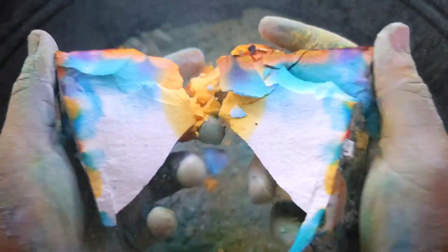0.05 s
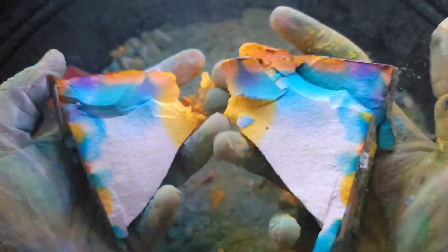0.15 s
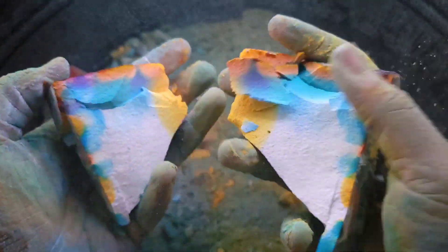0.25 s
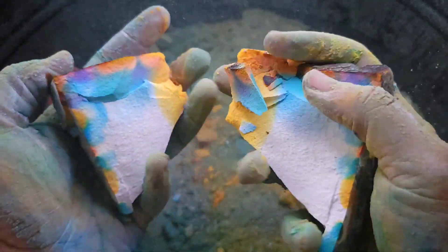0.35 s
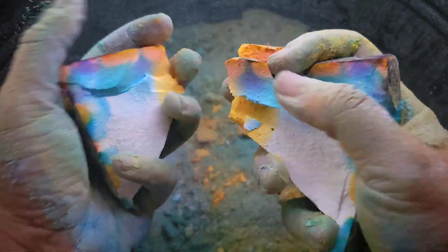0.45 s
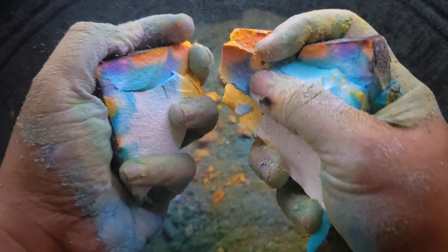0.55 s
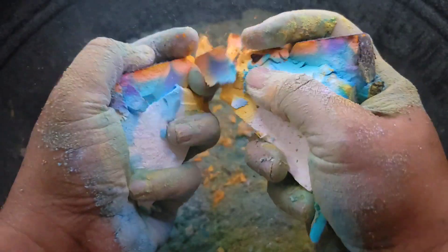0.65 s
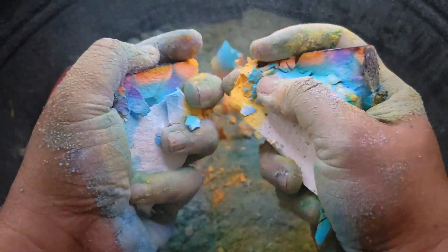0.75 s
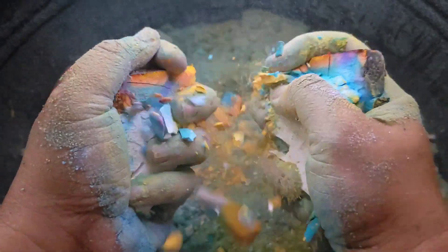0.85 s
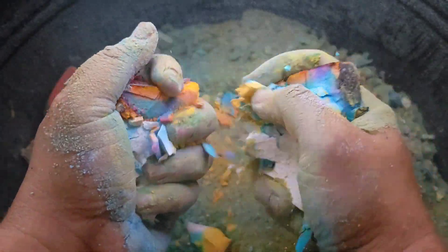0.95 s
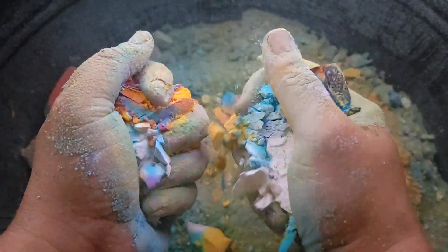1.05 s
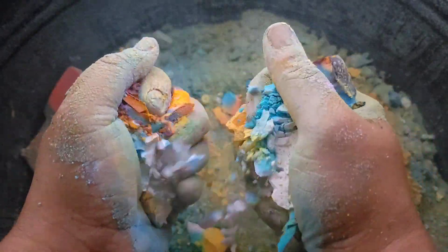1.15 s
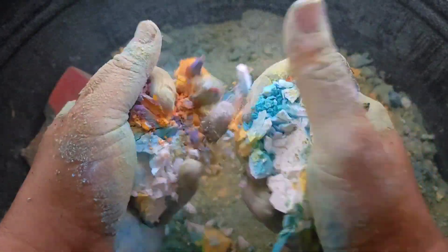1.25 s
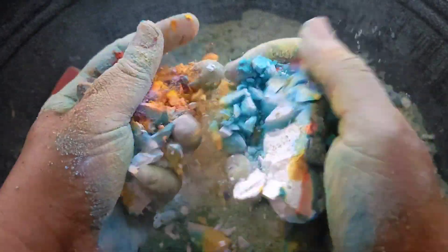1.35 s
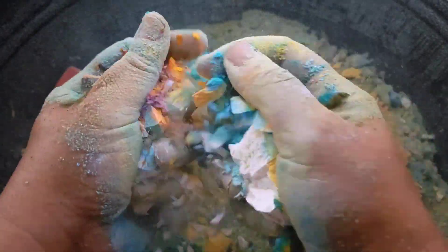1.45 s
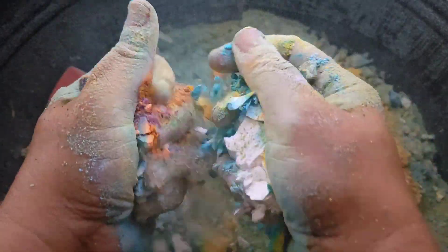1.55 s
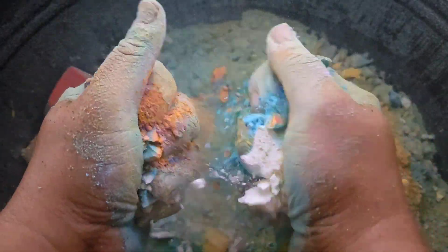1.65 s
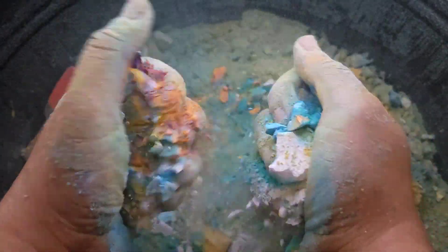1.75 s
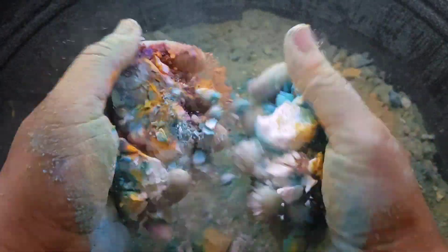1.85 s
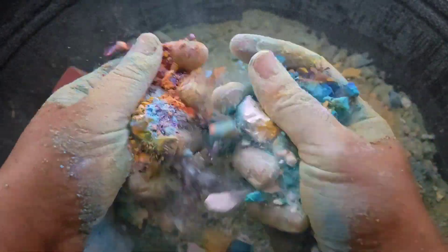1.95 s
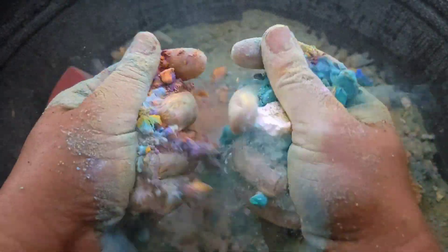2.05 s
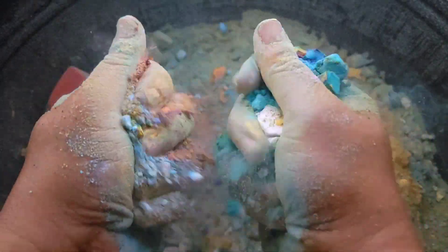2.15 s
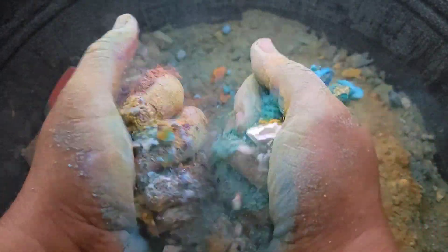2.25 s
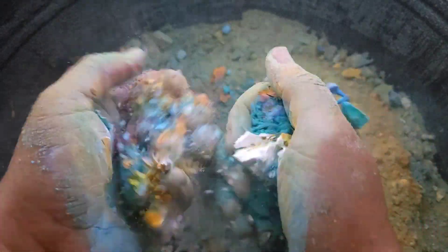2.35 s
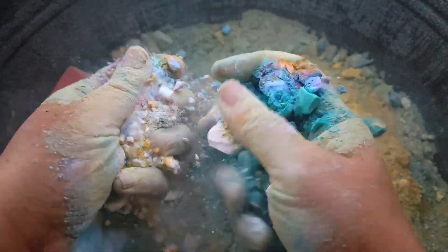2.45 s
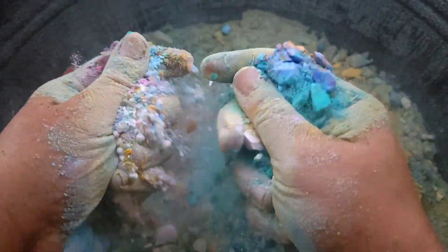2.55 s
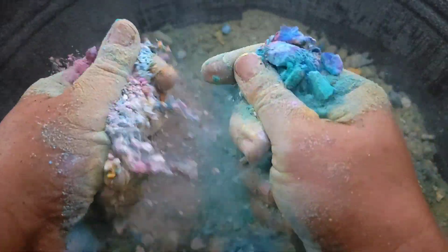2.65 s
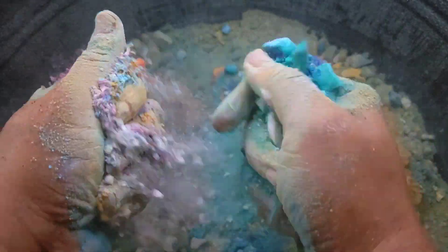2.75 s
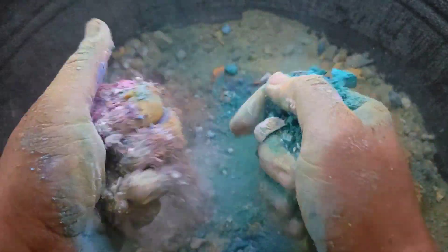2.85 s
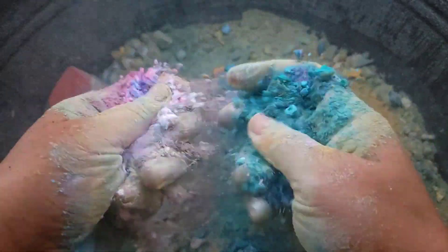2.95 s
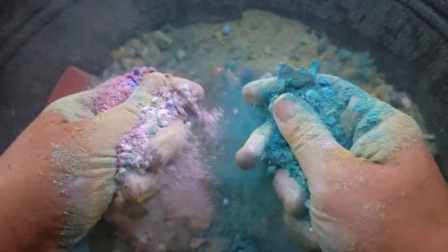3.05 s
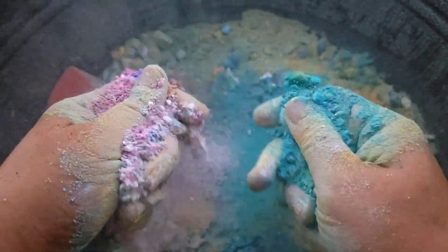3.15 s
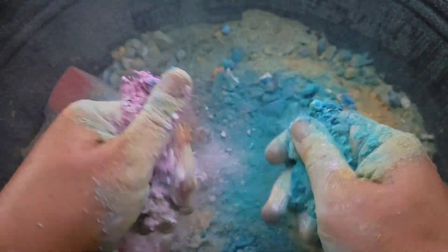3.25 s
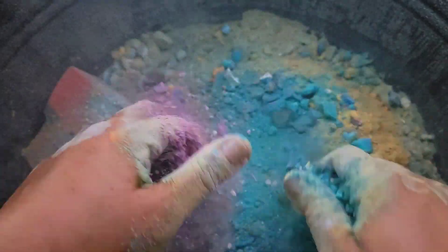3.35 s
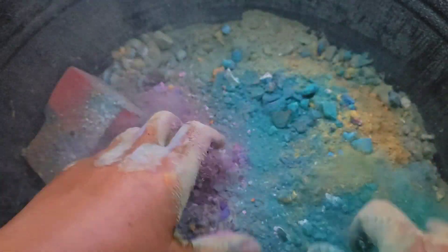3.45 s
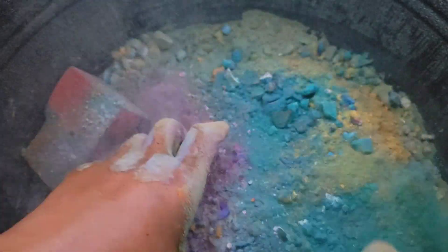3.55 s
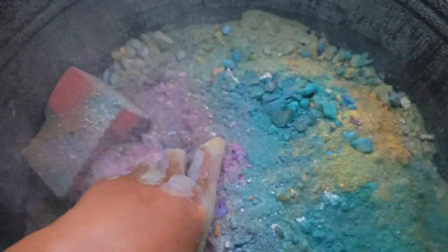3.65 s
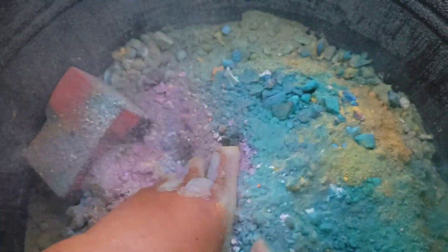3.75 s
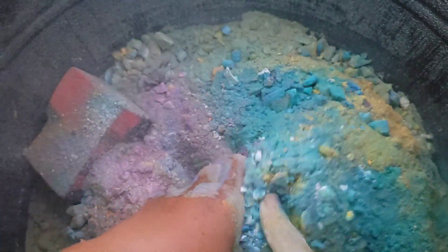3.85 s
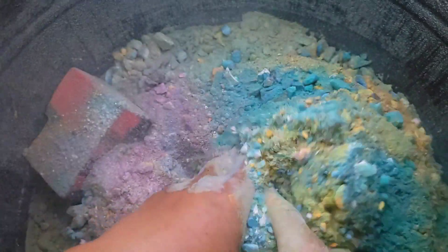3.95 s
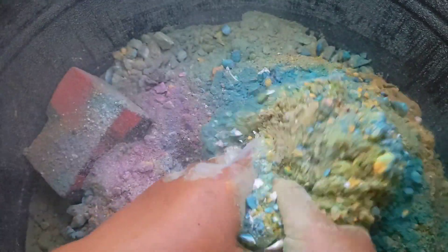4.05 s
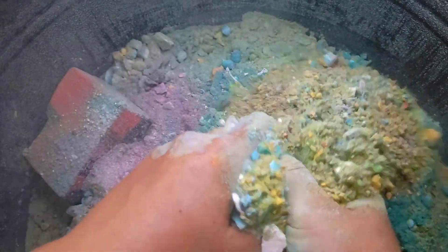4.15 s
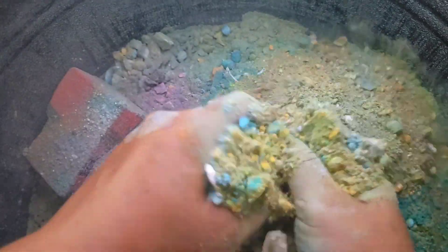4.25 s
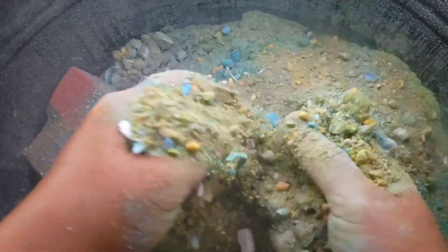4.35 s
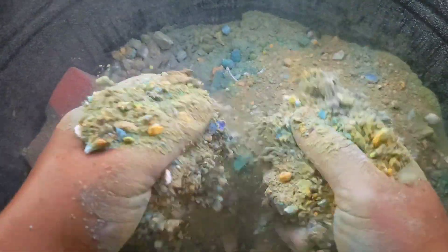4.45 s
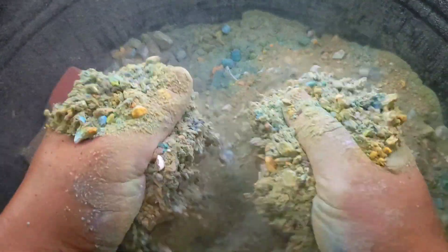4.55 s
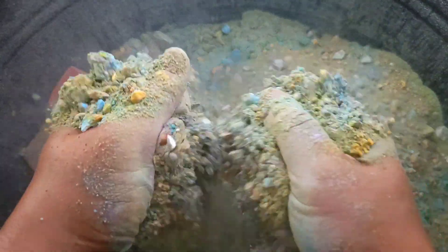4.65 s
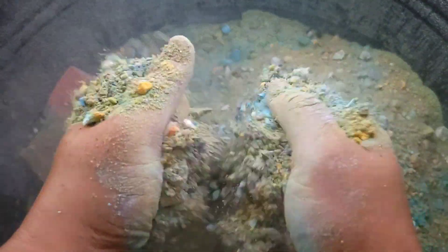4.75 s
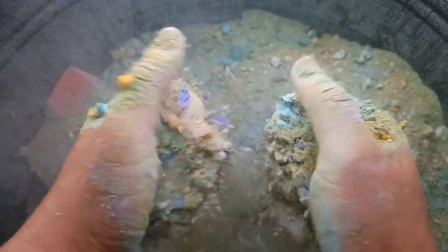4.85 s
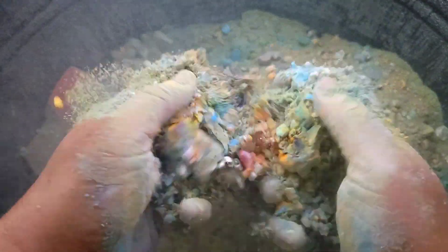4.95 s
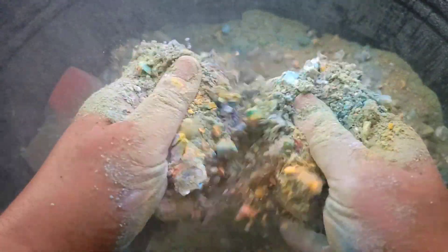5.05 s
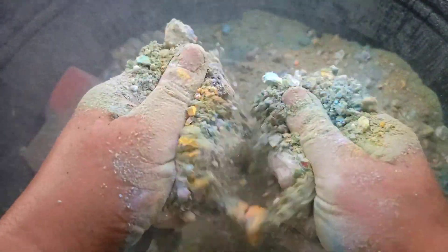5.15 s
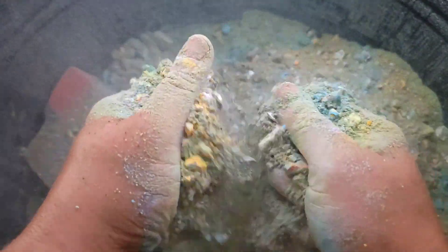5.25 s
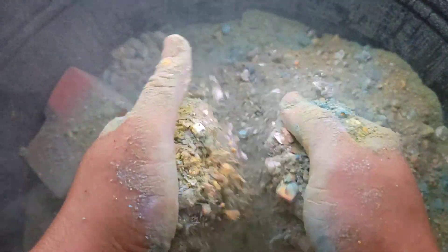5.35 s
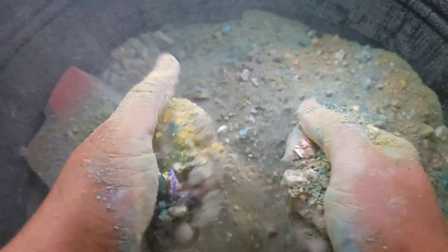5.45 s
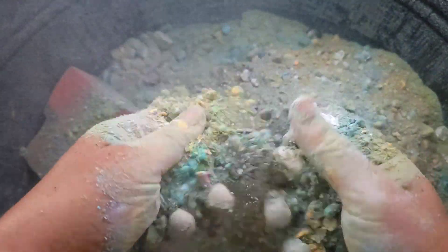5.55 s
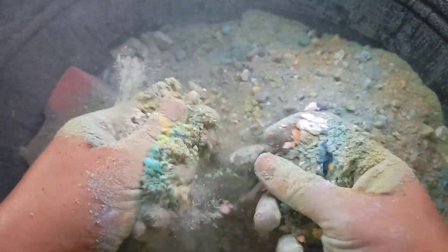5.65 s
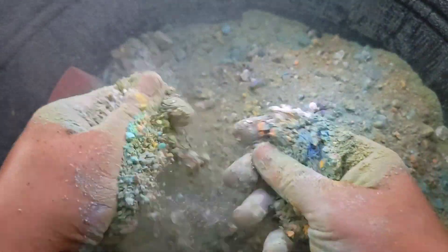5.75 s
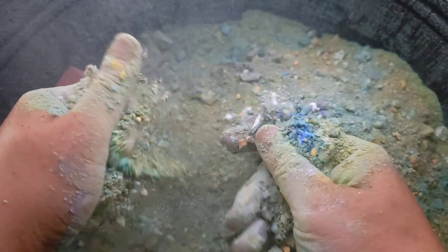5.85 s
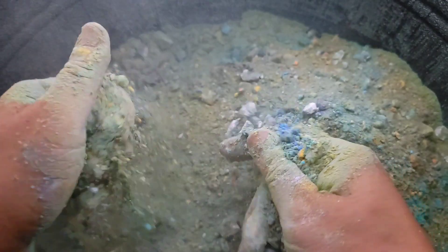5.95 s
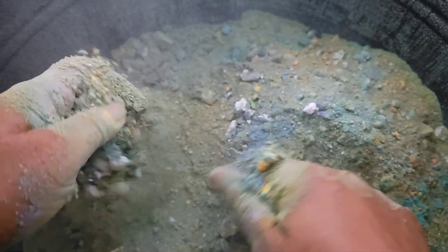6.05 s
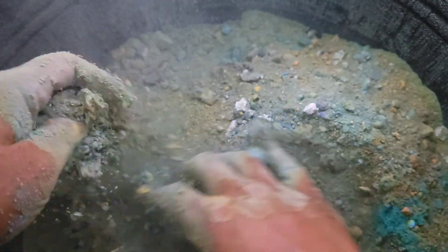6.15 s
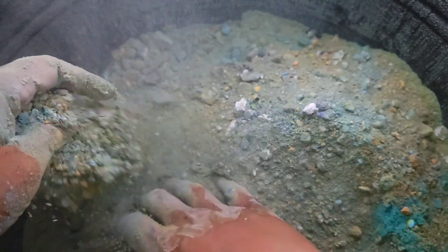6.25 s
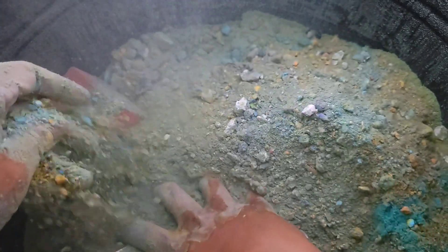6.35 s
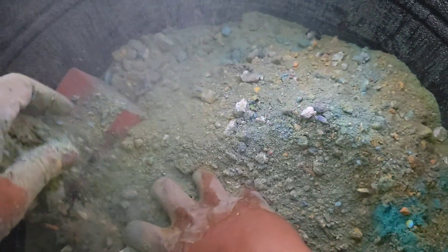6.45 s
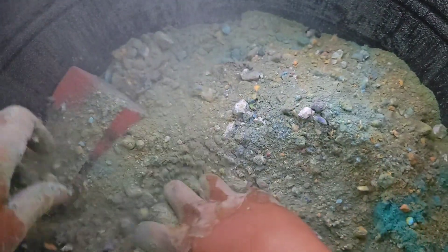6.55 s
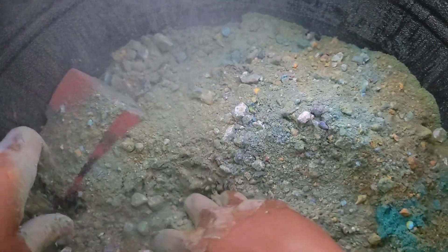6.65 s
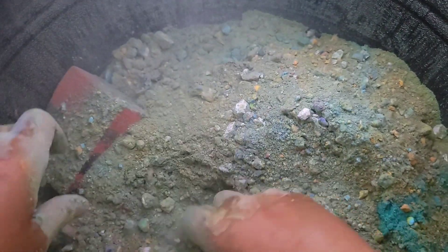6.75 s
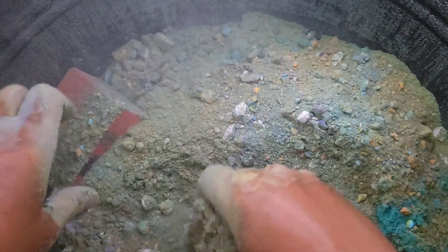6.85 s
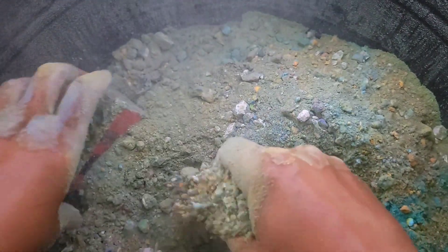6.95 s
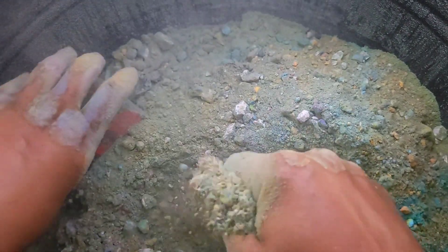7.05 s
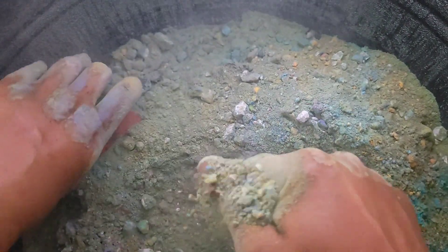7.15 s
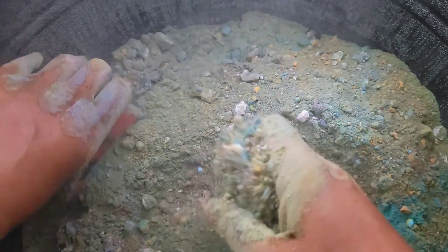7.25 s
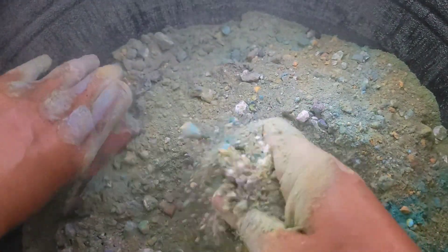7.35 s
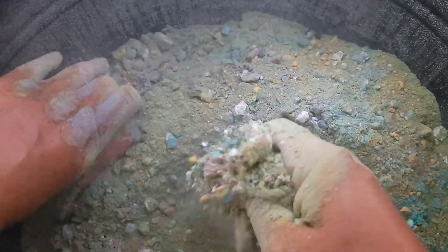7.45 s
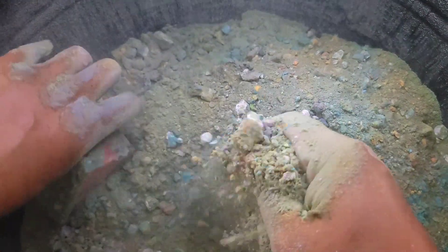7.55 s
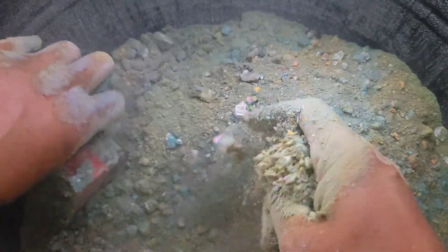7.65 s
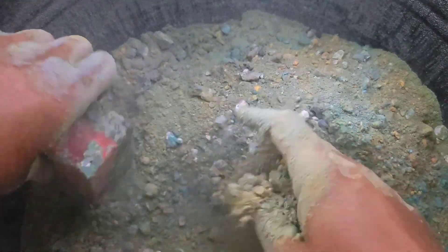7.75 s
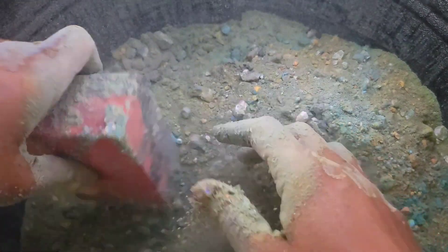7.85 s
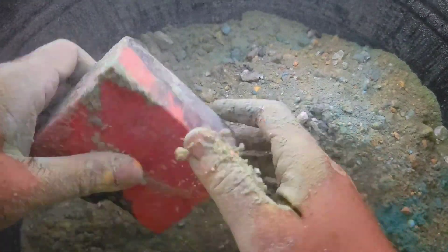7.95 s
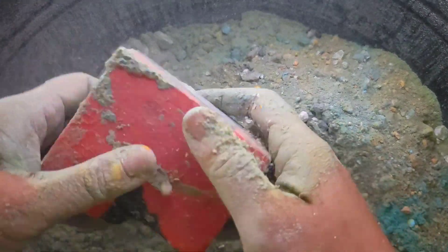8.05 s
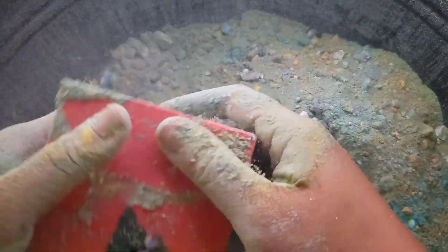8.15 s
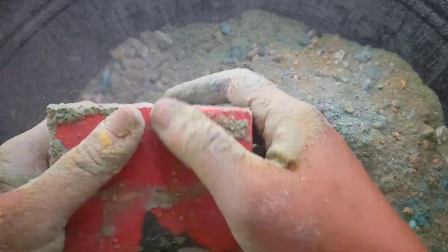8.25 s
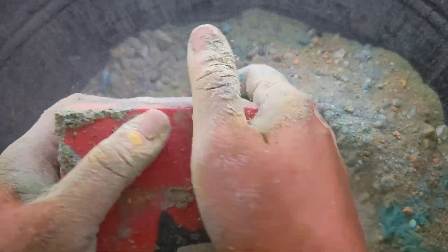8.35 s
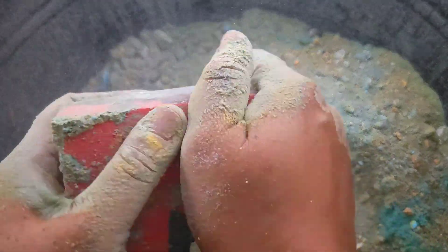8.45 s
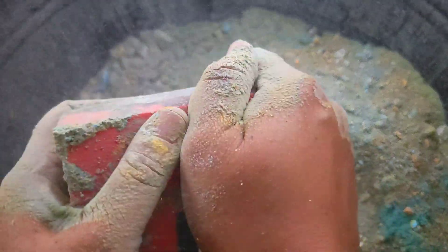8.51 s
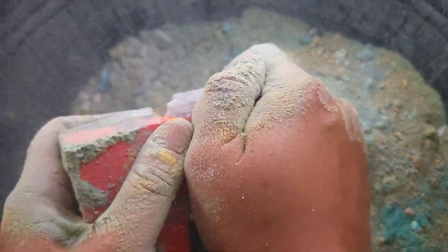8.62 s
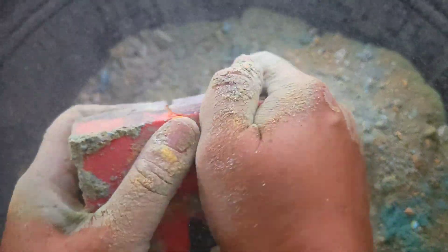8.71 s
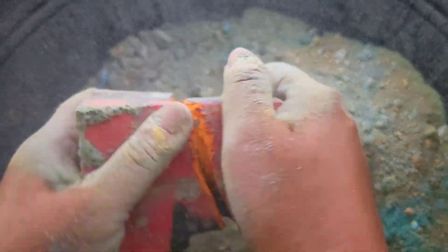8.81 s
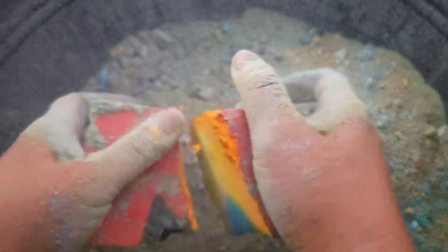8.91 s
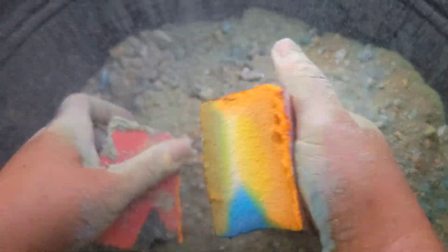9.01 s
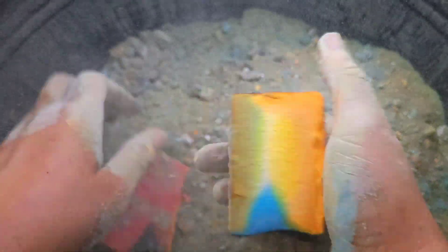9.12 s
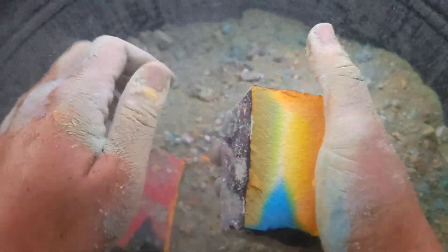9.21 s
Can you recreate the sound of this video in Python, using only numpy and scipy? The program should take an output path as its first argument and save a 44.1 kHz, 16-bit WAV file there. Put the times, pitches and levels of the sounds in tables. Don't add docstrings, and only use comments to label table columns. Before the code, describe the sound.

Hands snap and crush dry chalk blocks close up, crumbling them into gritty powder, then scoop, rumble and squeak over a faint hum.

```python
import sys
import numpy as np
from scipy import signal
from scipy.fft import rfft, irfft, next_fast_len
from scipy.io import wavfile
from scipy.ndimage import uniform_filter1d, map_coordinates

SR = 44100
rng = np.random.default_rng(int(sys.argv[2]) if len(sys.argv) > 2 else 0)


def wav_out(sig):
    wavfile.write(sys.argv[1], SR, np.round(np.clip(np.atleast_2d(sig).T, -1, 1) * 32767).astype(np.int16))


def volts(x):
    e = np.asarray(x, float) / 20
    return 10 ** e


N = 409248

# (frequency [Hz], level [dB])
AIR_SPECTRUM = [(15, -43), (25, -18), (70, -1.5), (149, -7), (236, -1.5), (659, -22.5), (988, -23),
                (1890, -44), (2480, -28), (3340, -53), (6920, -33), (16000, -46)]
# (frequency [Hz], level [dB])
HEAP_SPECTRUM = [(88, -10), (150, -8.5), (463, -3), (775, -15.5), (1350, -15.5), (3000, -35), (3900, -62),
                 (6600, -120)]
# (frequency [Hz], level [dB])
GRIT_SPECTRUM = [(530, -6.5), (900, 1), (1820, -3), (2010, -1), (3890, 0), (8000, -8.5), (10400, -16),
                 (17600, -120)]
# (frequency [Hz], level [dB])
DUST_SPECTRUM = [(3530, -12), (6000, -5.5), (12000, -18), (15100, -23), (16000, -25)]
# (time [s], pressure [dB], dustiness [dB])
SQUEEZE = [(0.0, -52, 23.5), (0.95, -43.5, 14), (1.32, -35.5, 11.5), (1.57, -31.5, 13.5), (1.72, -42.5, 1),
           (2.12, -46.5, 28.5), (2.4, -38.5, 4), (3.44, -41.5, 10), (3.56, -46, -20), (4.3, -40.5, -18),
           (4.73, -35.5, 13), (5.22, -35.5, 3), (5.45, -42, 1), (6.35, -40.5, 12.5), (7.15, -43, -8),
           (7.6, -39.5, 15), (8.6, -50, 1), (9.28, -58, 16)]
# (peak time [s], rise [s], fall [s], tub level [dB], heap level [dB])
SCOOPS = [(0.82, 0.12, 0.038, -33, -25), (0.998, 0.12, 0.11, -31, -49), (2.09, 0.3, 0.35, -64, -33.5),
          (3.67, 0.1, 0.28, -31.5, -31), (3.77, 0.42, 0.38, -24.5, -23.5), (4.05, 1, 0.58, -49, -35),
          (4.832, 0.039, 0.22, -30.5, -37), (5.2, 0.13, 0.62, -43, -40), (6.294, 0.1, 0.97, -31, -32),
          (6.48, 0.97, 0.53, -29, -34), (6.7, 0.78, 0.68, -54, -35), (7.44, 1, 0.94, -47, -38.5),
          (9.13, 0.076, 0.17, -35, -36)]
# (time [s], peak [dB], ring [Hz])
BREAKING_TICKS = [(0.0075, -27, 4640), (0.209, -25, 1720), (0.317, -24.5, 3350), (0.178, -22, 5890),
                  (0.4794, -24, 6760), (0.5126, -20, 5340), (0.5247, -4.5, 6150), (0.5862, -13.5, 2550),
                  (0.67, -21, 2450), (0.6908, -20, 8200), (0.763, -23, 4640), (0.8892, -5, 6500),
                  (0.914, -10, 3720), (0.872, -19, 9000), (1.0282, -8, 3570), (1.0731, -17, 5070),
                  (1.2273, -23.5, 6290), (1.3425, -23, 3620), (1.365, -18, 730), (1.3895, -16, 2970),
                  (1.44, -14.5, 2760), (1.4525, -18, 1680), (1.4586, -23, 1720), (1.505, -24, 1590),
                  (1.5632, -15.5, 1940), (1.5829, -13.5, 3400), (1.57, -15, 1800), (1.485, -23, 5800),
                  (1.7149, -20, 2670), (1.96, -17.5, 2070), (1.999, -18.5, 3320), (2.0579, -21, 5080),
                  (2.1115, -20, 2070), (1.9241, -28, 3480), (2.0798, -19, 3570), (2.3373, -24.5, 2000),
                  (2.5392, -25, 2400), (2.6678, -25, 8310), (0.9094, -16, 4260), (2.7713, -18.5, 724),
                  (2.968, -26, 1380), (2.8716, -26, 1550), (2.8914, -19.5, 730), (2.9126, -23, 720),
                  (3.0636, -26, 3270), (3.0526, -26, 2320), (3.202, -30, 3660), (3.8426, -27, 1120),
                  (3.9, -30, 7960), (3.5599, -27, 1380), (4.1626, -25.5, 990), (3.9739, -30, 1380),
                  (4.186, -24, 780), (4.235, -30, 1360), (4.2519, -26, 4310), (4.399, -23.5, 4690),
                  (4.4456, -21, 1720), (4.4743, -26, 3450), (4.5532, -20, 4350), (4.5821, -26, 4610)]
# (time [s], peak [dB], ring [Hz])
POWDER_TICKS = [(6.6117, -18, 1590), (4.68, -17, 5400), (4.7586, -15, 3680), (4.7965, -19, 1680),
                (4.872, -18, 1980), (4.8821, -17.5, 706), (4.9292, -17, 6890), (4.9827, -30, 2880),
                (5.0154, -23, 5000), (5.0327, -21, 2670), (5.0717, -17, 4780), (5.1171, -22, 2450),
                (5.1836, -21, 2540), (5.2322, -33, 2660), (5.316, -23, 720), (5.372, -29, 2410),
                (5.4418, -24, 2150), (5.5626, -24, 2710), (5.6336, -30, 2970), (5.64, -24.5, 1390),
                (5.77, -29, 2410), (5.8, -19, 2410), (5.749, -29, 1850), (5.8128, -16, 1480),
                (5.9096, -25.5, 2700), (5.889, -27, 7100), (6.0978, -27, 2240), (6.137, -21, 2540),
                (6.1588, -22, 2000), (6.185, -20, 7410), (6.2049, -25, 4650), (6.2497, -24, 3190),
                (6.2758, -21, 6200), (6.3464, -22, 1420), (6.3558, -23, 5080), (6.4185, -26, 3660),
                (6.4256, -29, 3190), (6.4426, -21, 3010), (6.503, -25, 5380), (6.5918, -19, 4650),
                (6.6203, -19, 3700), (6.65, -26, 2410), (6.738, -27, 730), (6.7604, -22, 730),
                (6.7757, -22, 960), (6.885, -26, 1680), (6.894, -23.5, 2410), (6.9032, -22, 4010),
                (6.9129, -27, 3920), (7.005, -18.5, 2410), (7.067, -19.5, 4280), (7.125, -27.5, 4780),
                (7.318, -19, 900), (7.4062, -24, 3700), (7.641, -28, 1380), (7.8682, -28, 3490),
                (7.0299, -23, 3740), (7.0538, -23, 2320), (8.4812, -32, 5850), (8.5165, -36, 2670)]
# (time [s], peak [dB], ring [Hz])
SPLINTERS = [(8.0912, -20.5, 3600), (1.1955, -18, 2060), (0.8374, 0, 3600), (8.5584, -8, 1540),
             (8.5584, 1, 4250), (3.1805, -15, 8000), (0.968, 0, 1000), (4.5205, -7.5, 1290),
             (4.632, -15.5, 1400), (9.1165, -16, 3100), (0.8871, -16, 7000), (8.559, -2, 5000)]
# (time [s], peak [dB], ring [Hz], knock [dB], edge [dB])
SNAPS = [(0.1317, -3, 1500, -13, -5.5), (0.5223, -11.5, 6300, -16, 3.5), (0.627, 1, 3830, -19.5, -6.5),
         (0.8032, 2.5, 3340, -30, -18), (0.9665, 8, 1480, -16, -17), (0.9847, -1, 4660, -13.5, -3),
         (1.0238, -2, 1860, -12.5, -11), (1.0419, -3.5, 1890, -23, -2), (1.639, -7, 1990, -12, 0),
         (2.0473, -11.5, 2060, -19, 1.5), (2.2846, -5.5, 2380, -26, -20), (3.5325, -18, 1164, -10, -47),
         (3.5409, -10.5, 1155, -15, -43), (4.5198, -2.5, 2600, -27, -33), (4.631, -4, 1940, -26, -31),
         (4.7046, -3.5, 4660, -27, -1), (4.834, -3.5, 4060, -33, -11), (5.2082, -5.5, 2540, -17, 0),
         (6.5965, -6, 1130, -19, -2.5), (6.722, -8.5, 1620, -15.5, -32.5), (6.7749, -9, 1160, -20, -31.5),
         (7.6036, -18.5, 900, 0, 4), (8.558, 1.5, 2230, -10, 2.5), (9.1161, -13, 2850, -17, -11.5)]
# (time [s], peak [dB], ring [Hz])
SHARDS = [(0.2223, -17.5, 1600), (0.2571, -12, 1780), (0.4196, -16.5, 3400), (0.504, -18, 5000),
          (0.588, -31, 2800), (0.6146, -14.5, 7600), (0.623, -11, 3920), (0.755, -16, 3660),
          (0.771, -12, 6520), (0.7965, -7, 2800), (0.8224, -1, 5250), (0.7478, -15, 4720),
          (0.8366, -2, 3580), (0.886, -17, 6300), (0.9134, -15.5, 1950), (0.9408, -15, 5300),
          (1.0622, -6.5, 3450), (1.0897, -6, 3680), (1.131, -16, 7970), (1.1935, -18.5, 4820),
          (1.3338, -16.5, 8550), (1.352, -9, 2560), (1.3597, -10, 3340), (1.4284, -13, 1310),
          (1.443, -15, 1560), (1.5946, -14, 3010), (1.6292, -11, 5880), (1.6533, -8, 3870),
          (1.6682, -5, 6360), (1.701, -14.5, 4100)]
# (time [s], peak [dB], ring [Hz])
PIECES = [(1.798, -14.5, 1940), (1.9299, -15.5, 2650), (1.962, -17, 6200), (1.9704, -8.5, 2110),
          (2.0103, -13, 1770), (2.0357, -9, 1920), (2.0671, -8, 2050), (2.086, -16, 3570),
          (2.095, -6.5, 6300), (2.1057, -12, 2000), (2.2187, -16, 3730), (2.6553, -13.5, 5000),
          (2.7072, -16, 3480), (2.739, -16, 2630), (2.7713, -11, 4060), (2.847, -16.5, 2580),
          (2.861, -16, 2500), (2.9163, -20, 5630), (2.948, -16.5, 1010), (3.0628, -21.5, 840),
          (3.093, -17.5, 3760), (3.271, -16.5, 2430), (3.282, -18.5, 760), (3.393, -13.5, 2440),
          (3.4393, -15, 5570), (3.451, -10, 2930), (3.18, -11.5, 3700), (4.237, -14, 1240),
          (4.277, -17.5, 1070)]
# (time [s], peak [dB], ring [Hz])
LUMPS = [(4.431, -19.5, 4470), (4.561, -9.5, 4540), (4.6003, -17, 1810), (4.6502, -13.5, 4430),
         (4.675, -14, 4200), (4.71, -14, 3810), (4.7334, -10, 1900), (4.7469, -9.5, 2840),
         (4.768, -16, 2780), (4.847, -13, 1830), (4.886, -9.5, 4600), (5.009, -11.5, 4030),
         (5.077, -19, 2640), (5.104, -11.5, 5130), (5.135, -15.5, 1750), (5.143, -8.5, 3900),
         (5.1718, -14.5, 3700), (5.259, -12, 3340), (5.301, -14, 6760), (5.8068, -14, 2340),
         (6.121, -12.5, 2300), (6.259, -20, 3020), (6.5288, -14, 5870), (6.63, -11.5, 1600),
         (6.849, -13, 2000), (6.994, -13, 3920), (7.0702, -19, 1770), (7.416, -11.5, 3500),
         (7.472, -10, 2860), (7.753, -17, 3170)]
# (time [s], peak [dB], ring [Hz])
STRAYS = [(0.0783, -27, 2000), (1.0274, -10, 2040), (1.247, -18, 1960), (1.4198, -15.5, 5000),
          (5.743, -18.5, 2650), (5.9885, -19, 3850), (6.099, -28, 2350), (6.4855, -15, 330),
          (7.447, -19.5, 935), (8.502, -24.5, 4550), (8.534, -30, 5500), (9.1165, -18, 850)]
# (frequency [Hz], t60 [s])
WALL_T60 = [(200, 0.41), (1000, 0.1), (5000, 0.18), (12000, 0.26)]
# (start [s], end [s], level [dB], crumb pitch [Hz])
CRUNCHES = [(0.155, 0.221, -42, 5500), (0.784, 0.851, -25, 3700), (0.847, 0.933, -33.5, 5370),
            (0.98, 0.995, -30, 4600), (1.053, 1.107, -33, 4160), (2.145, 2.222, -35, 3670),
            (2.484, 2.626, -39.5, 2900), (6.326, 6.374, -42, 3500), (6.974, 7.083, -43.5, 3970),
            (3.632, 3.901, -41.5, 1430), (4.194, 4.292, -33.5, 1150), (6.249, 6.297, -35.5, 1200),
            (6.425, 6.455, -32.5, 1540), (6.588, 6.68, -33, 1220), (7.725, 7.766, -38.5, 3580),
            (8.563, 8.653, -43.5, 4530)]
# (start [s], end [s], first level [dB], last level [dB], squeak [Hz], second squeak [Hz])
RUBS = [(0.284, 0.337, -55, -45, 5500, 3450), (0.395, 0.428, -48, -29, 4660, 6550),
        (0.442, 0.484, -50, -39, 4800, 6500), (7.987, 8.069, -40.5, -46.5, 3850, 2850),
        (8.076, 8.216, -43, -41, 3510, 2240), (8.231, 8.338, -37.5, -47, 3420, 5200),
        (8.314, 8.377, -40.5, -36, 3340, 2240), (8.361, 8.459, -37, -51, 4470, 3300),
        (8.695, 8.74, -50, -51, 2670, 6900), (8.805, 8.909, -38, -29, 6940, 3400),
        (8.932, 8.936, -37, -38, 4800, 8150), (9.241, 9.29, -54, -53, 4600, 6700),
        (9.146, 9.225, -36.5, -48, 4800, 7150), (8.754, 8.805, -57, -43, 4340, 5500),
        (9.062, 9.104, -53, -60, 5500, 7000)]
# (start [s], end [s], first level [dB], last level [dB], squeak [Hz], second squeak [Hz])
WIPES = [(7.243, 7.323, -36, -35.5, 3770, 2240), (7.49, 7.58, -42, -54.5, 6300, 3870),
         (7.593, 7.625, -40, -57, 6160, 4000), (9.097, 9.132, -44, -33, 5300, 8400),
         (9.161, 9.183, -48, -40, 7150, 4830), (7.18, 7.236, -52.5, -68, 9000, 5000),
         (7.326, 7.482, -60.5, -54.5, 6000, 4000), (7.628, 7.768, -68, -52, 6070, 4000)]
# (time [s], lift [dB])
CATCHES = [(8.022, 7), (8.089, 4.5), (8.103, 5.5), (8.135, 3), (8.171, 7.5), (8.201, 8), (8.33, 6),
           (8.365, 1), (8.804, 9), (9.119, 4), (9.176, 4.5)]
# (frequency [Hz], width [Hz], level [dB])
BLOCK_MODES = [(2290, 190, -7), (2850, 250, -7), (4800, 1200, -1), (6310, 1020, -4.5), (8400, 980, -7)]
# (time [s], peak [dB], ring [Hz])
BUMPS = [(6.285, -23, 76), (6.481, -22, 134), (7.186, -22.5, 72), (7.235, -20.5, 90), (7.317, -21.5, 80),
         (7.434, -28.5, 59.2), (7.509, -35, 88.8), (7.604, -9, 82), (9.132, -24.5, 74.5),
         (9.154, -28, 56.6)]
# (frequency [Hz], level [dB])
TUB_SPECTRUM = [(15, -39), (25, -57), (53, 1.5), (124, 0), (273, 0.5), (300, -11), (390, 3), (660, -120)]


def unit(x):
    return x / np.sqrt(np.mean(x ** 2) + 1e-20)


def along(points, hz):
    f, v = np.transpose(points)
    return np.interp(np.log(hz + 1), np.log(f + 1), v)


def curve(rows, axis):
    rows = np.array(rows)
    return np.interp(np.arange(N) / SR, rows[:, 0], rows[:, axis], left=-200, right=-200)


def wobble(rate_hz):
    knots = rng.standard_normal(int(N * rate_hz / SR) + 4)
    return map_coordinates(knots, [np.arange(N) * rate_hz / SR])


def filtered(x, response):
    m = next_fast_len(N + SR // 2)
    return irfft(rfft(x, m) * response(np.fft.rfftfreq(m, 1 / SR)), m)[:N]


def coloured(x, spectrum):
    return unit(filtered(x, lambda hz: volts(along(spectrum, hz))))


def noise():
    return rng.standard_normal(N)


def impulses(s, gain):
    return np.bincount(np.round(s * SR).astype(int), gain, N)


def burst(kicks, t60_s, rise_s):
    swell = uniform_filter1d(kicks, int(rise_s * SR) + 1)
    return signal.lfilter([1], [1, -volts(-60 / (t60_s * SR))], swell)


def rings(s, hz, cycles, gain, rise_cycles, size):
    turns = np.arange(size) / SR * hz[:, None]
    decay = volts(-60 * turns / np.reshape(cycles, (-1, 1)))
    attack = 1 - np.exp(-turns / np.reshape(rise_cycles, (-1, 1)))
    wave = gain[:, None] * (decay * attack) * np.sin(2 * np.pi * turns)
    at = np.round(s * SR).astype(int)[:, None] + np.arange(size)
    return np.bincount(at.ravel(), wave.ravel(), N + SR)[:N]


def air():
    phase = 2 * np.pi * 239 * np.arange(N) / SR + 0.35 * wobble(25)
    hum = np.sin(phase) * volts(2.4 * wobble(14.0))
    return volts(-45.5 + wobble(2.5)) * coloured(noise(), AIR_SPECTRUM) + volts(-44.5) * hum


def slips(count, spread_db, t60_s):
    kicks = np.zeros(N)
    at = (rng.random(count) * N).astype(int)
    kicks[at] = volts(spread_db * np.clip(rng.standard_normal(count), -3, 1.3))
    return unit(burst(kicks, t60_s, rise_s=0.0019))


def grains(count, hz, octaves, cycles, spread_db, size):
    when = rng.random(count) * N / SR
    tone, force = np.clip(rng.standard_normal((count, 2)), -2.2, 2.2).T
    pitch_hz = np.minimum(hz * 2 ** (octaves * tone), SR / 3)
    return unit(rings(when, pitch_hz, cycles, volts(spread_db * force), 0.26, size))


def scoops(axis):
    range_db = 41
    t, power = np.arange(N) / SR, np.zeros(N)
    for row in SCOOPS:
        away = np.maximum((row[0] - t) / row[1], (t - row[0]) / row[2])
        power += volts(row[axis] - range_db * away) ** 2
    return np.sqrt(power)


def crumble():
    heap_db, heap_follows = -47.5, 0.55
    swell = (0.81 + 0.7 * slips(count=1600, spread_db=3.5, t60_s=0.016)) * volts(wobble(18))
    heap = coloured(swell * volts(2.1 * wobble(60)) * noise(), HEAP_SPECTRUM)
    heap += 0.36 * grains(count=1500, hz=677, octaves=0.47, cycles=10.0, spread_db=6, size=500)
    grit = coloured(swell * volts(2.2 * wobble(90)) * noise(), GRIT_SPECTRUM)
    crumbs = grains(count=6000, hz=3210, octaves=0.58, cycles=6, spread_db=3.6, size=220)
    grit += 0.82 * unit(swell * crumbs)
    dust = coloured(swell * volts(3 * wobble(90)) * noise(), DUST_SPECTRUM)
    fine = grit + volts(curve(SQUEEZE, axis=2) - 15) * dust
    pressure_db = curve(SQUEEZE, axis=1)
    falling = volts(heap_db + heap_follows * (pressure_db - pressure_db.mean()))
    shifting = scoops(axis=4)
    return np.hypot(falling, shifting) * heap + volts(-23.0) * shifting * dust + volts(pressure_db - 5.5) * fine


def ticks():
    s, db, hz = np.transpose([*BREAKING_TICKS, *POWDER_TICKS, *SPLINTERS])
    chance = np.clip(rng.standard_normal((len(s), 2)), -2, 2)
    polarity = np.sign(chance[:, 0])
    click = rings(s, hz, 10 * np.sqrt(hz / 3000), polarity * volts(db + 6), 0.5, size=400)
    overtone_hz = np.minimum(hz * 1.6 * volts(1.5 * chance[:, 1]), SR / 4)
    click += rings(s, overtone_hz, 9, volts(db + 1), 0.7, size=200)
    puff = burst(impulses(s, volts(db - 10.5)), t60_s=0.014, rise_s=0.001)
    return click + puff * coloured(noise(), GRIT_SPECTRUM)


def fracture(s, db, hz, edge_db):
    chance = np.clip(rng.standard_normal((len(s), 2)), -2, 2)
    dull = np.clip((-31.5 - edge_db) / 5, 0, 1)
    gain = np.sign(chance[:, 1]) * volts(db + 5.5 + 6.0 * dull)
    ring = rings(s, hz, (6 + 9 * dull) * volts(chance[:, 0]), gain, 0.34 + 1.4 * dull, size=500)
    ring += rings(s, np.minimum(1.1 * hz, SR / 3), 4.2, volts(db - 21.0 - 20 * dull), 0.83, size=300)
    ring += rings(s, hz / 2, 3.8, volts(db - 7.0 - 3 * dull), 0.68, size=500)
    late, tone, force = np.clip(rng.standard_normal((len(s), 8, 3)), -2.2, 2.2).T
    late_s = 0.002 * late ** 2 * np.where(late < -1, -0.35, 1)
    pitch_hz = np.minimum(hz * 2 ** (0.53 * tone), SR / 3).ravel()
    gain = volts(db - 11 - 10.0 * dull - 310 * np.abs(late_s) + 3.6 * force)
    cycles = 9 * np.sqrt(pitch_hz / 3000)
    ring += rings(np.abs(s + late_s).ravel(), pitch_hz, cycles, gain.ravel(), 0.48, size=400)
    kicks = impulses(s, volts(db - 20.0 - 21.0 * dull) * hz / 3000)
    return ring + burst(kicks, t60_s=0.038, rise_s=0.0012) * coloured(noise(), GRIT_SPECTRUM)


def snaps():
    small = np.array([*SHARDS, *PIECES, *LUMPS, *STRAYS])
    octaves = np.log2(small[:, 2:] / 3000)
    small_knock_db = -19.5 - 4.5 * octaves
    small_edge_db = -7 + 4 * octaves
    small = np.hstack([small, small_knock_db, small_edge_db])
    s, db, hz, knock_db, edge_db = np.vstack([SNAPS, small]).T
    chance = rng.standard_normal((len(s), 2))
    knock = rings(s, 270 * volts(.5 * chance[:, 0]), 5.8, volts(db + knock_db + 3.5), 0.24, size=2600)
    knock += rings(s, 500 * volts(2.6 * chance[:, 1]), 5.76, volts(db + knock_db + 8.0), 0.18, size=1200)
    crack = burst(impulses(s, volts(db + edge_db - 9.0)), t60_s=0.012, rise_s=0.0016)
    edge = crack * coloured(noise(), DUST_SPECTRUM)
    return fracture(s, db, hz, edge_db) + knock + edge


def walls(x):
    hz, t, z = signal.stft(rng.standard_normal(SR // 3), SR, nperseg=256)
    decay = volts(-60 * t / along(WALL_T60, hz)[:, None])
    tail = signal.istft(z * decay, SR, nperseg=256)[1]
    return signal.fftconvolve(np.pad(x, (220, 0)), tail / np.linalg.norm(tail))[:N]


def crunch():
    out = np.zeros(N)
    for start, end, db, hz in CRUNCHES:
        when = start + (end - start) * rng.random(160) ** 1.2
        tone, force = np.clip(rng.standard_normal((160, 2)), -2, 2).T
        crumbs = rings(when, hz * 2 ** (0.72 * tone), 9.6, volts(4 * force), 0.3, size=300)
        out += volts(db) * unit(crumbs) * np.sqrt((end - start) * SR / N)
    return out


def mode(hz, centre_hz, width_hz):
    damping = 1j * hz * width_hz
    return damping / (centre_hz * centre_hz - hz * hz + damping)


def block_body():
    grip_shift_db, skin_damping = 3.5, 1.3
    body = np.zeros(N)
    for centre_hz, width_hz, db in BLOCK_MODES:
        tone = filtered(noise(), lambda hz: mode(hz, centre_hz, skin_damping * width_hz) ** 2)
        body += volts(db + grip_shift_db * wobble(18)) * tone
    return unit(body)


def squeaking(hz, second_hz, size):
    grid_hz = np.fft.rfftfreq(8192, 1 / SR)
    response = mode(grid_hz, hz, 100) - 0.55 * mode(grid_hz, second_hz, 170)
    return unit(irfft(rfft(rng.standard_normal(8192)) * response))[:size]


def rub():
    rub_bright_db, wipe_bright_db, squeak_share = -5, 6, 1.55
    stroke_in_s, stroke_out_s = 0.008, 0.018
    grip = volts(0.89 * wobble(55) + 2.0 * wobble(250))
    body = block_body()
    grit = grains(count=12000, hz=5000, octaves=0.5, cycles=4.2, spread_db=6, size=120)
    hiss = unit(coloured(noise(), DUST_SPECTRUM) + 0.3 * grit)
    catch = volts(1.7 * wobble(49))
    out = np.zeros(N)
    strokes = [(*row, rub_bright_db) for row in RUBS] + [(*row, wipe_bright_db) for row in WIPES]
    for start, end, first_db, last_db, hz, second_hz, bright_db in strokes:
        first = max(int((start - stroke_in_s / 2) * SR), 0)
        span = slice(first, min(int((end + stroke_out_s / 2) * SR), N))
        size = len(out[span])
        t = np.arange(size) / SR
        edges = np.clip(np.minimum(t / stroke_in_s, t[::-1] / stroke_out_s), 0, 1)
        level_db = np.linspace(first_db, last_db, size)
        firmness = volts(.5 * (level_db - max(first_db, last_db)))
        squeak = squeaking(hz, second_hz, size) * catch[span] * firmness
        stroke = body[span] + squeak_share * volts(bright_db / 3) * squeak + volts(bright_db + 4.0) * hiss[span]
        out[span] += volts(level_db) * edges * stroke
    s, lift_db = np.transpose(CATCHES)
    jerks = impulses(s, volts(lift_db) - 1)
    grip = grip * (1 + burst(jerks, t60_s=0.049, rise_s=0.002))
    return filtered(grip * out, lambda hz: hz ** 4 / (hz ** 4 + 1500 ** 4))


def tub():
    s, db, hz = np.transpose(BUMPS)
    boom = rings(s + 0.0028, hz, 5.3, -volts(db + 14.5), 0.46, size=9000)
    boom += rings(s + 0.0486, hz * 0.906, 17, volts(db - 10), 0.83, size=16000)
    rumble = coloured(volts(4.0 * wobble(28)) * noise(), TUB_SPECTRUM)
    return boom + scoops(axis=3) * rumble


def scene():
    cracks = snaps()
    reflections = volts(-12.5) * walls(cracks)
    rest = reflections + crunch() + crumble() + rub() + tub() + air()
    return (cracks + rest + ticks())[None]


def low_pass(x):
    return signal.sosfilt(signal.butter(12, 16440, fs=SR, output="sos"), x)


def record(dry):
    def microphone(hz):
        bass_cut = (1j * hz / (25 + 1j * hz)) ** 2
        return bass_cut * np.where(hz < 15800, 1, volts(-24)) * np.where(hz < 16420, 1, volts(-20))

    flat = dry[0] / (1 + np.abs(dry[0]) ** 8) ** (1 / 8)
    band = filtered(flat, microphone)
    return low_pass(.97 * band[None])


dry = scene()
out = record(dry)
wav_out(out)
```